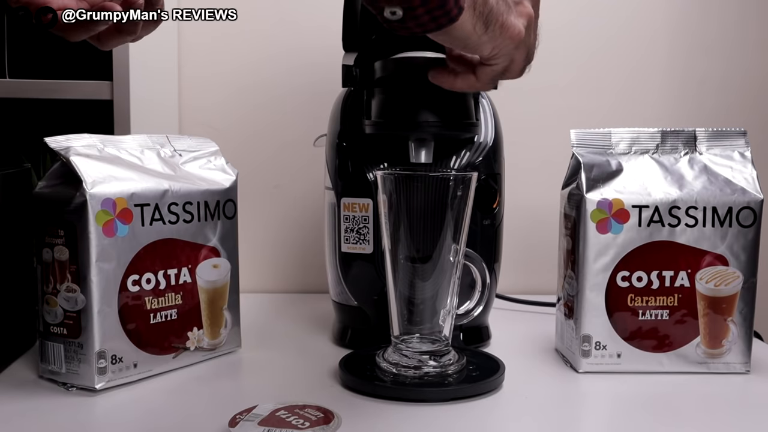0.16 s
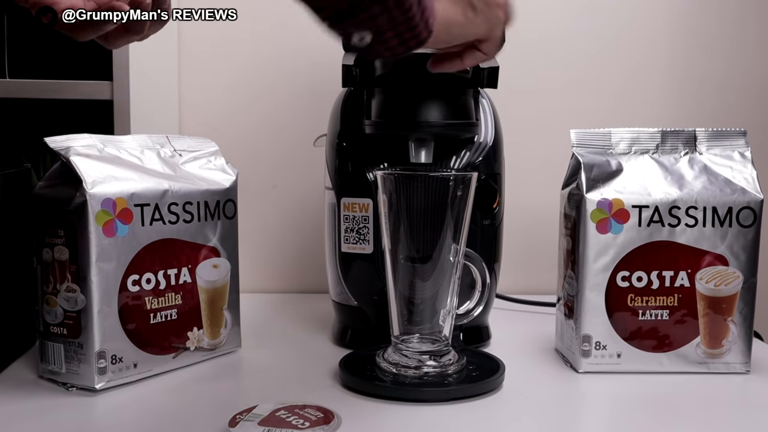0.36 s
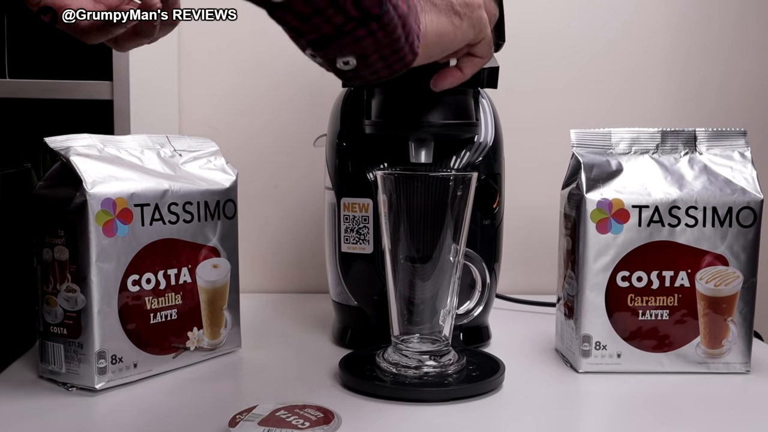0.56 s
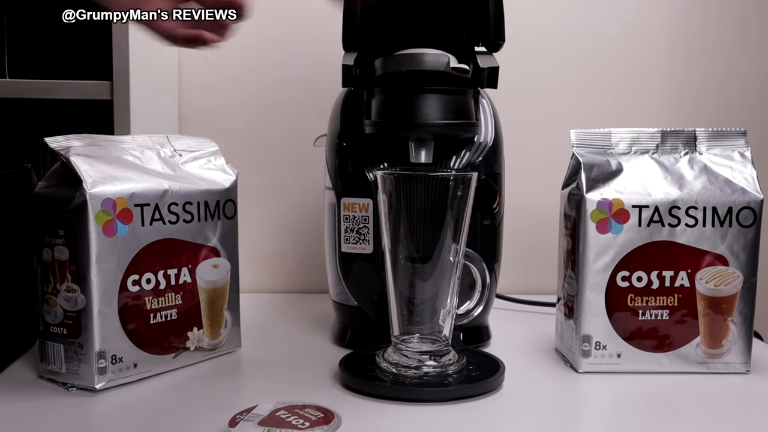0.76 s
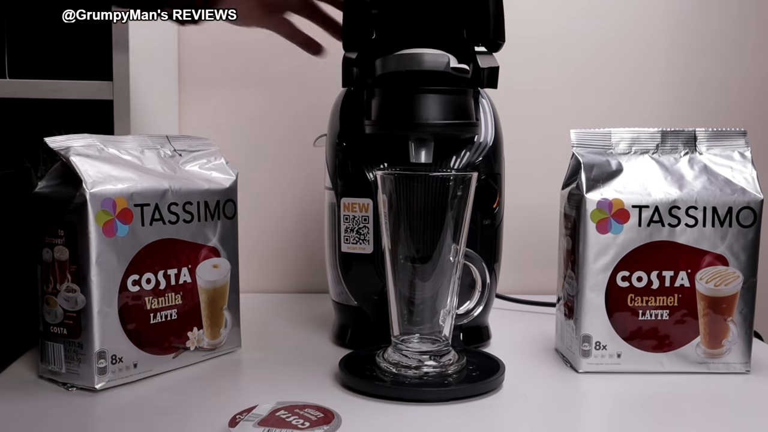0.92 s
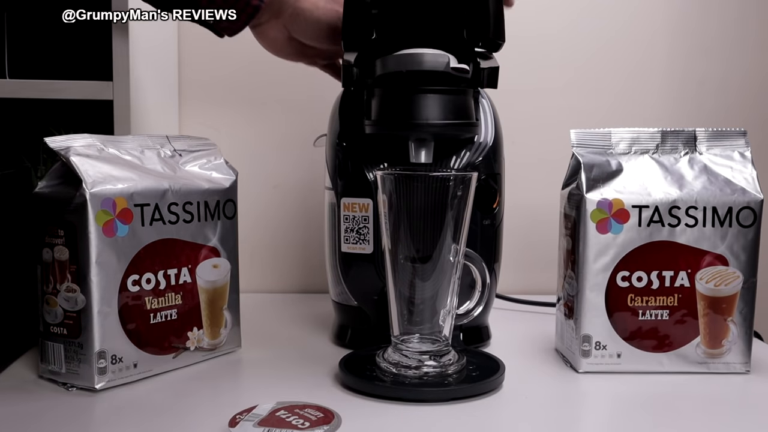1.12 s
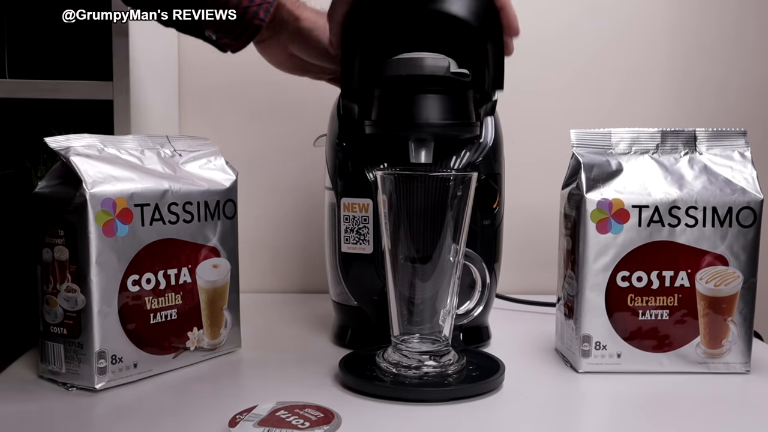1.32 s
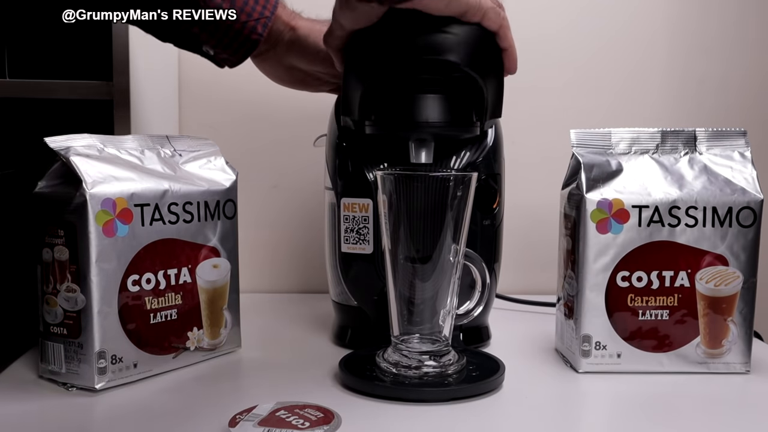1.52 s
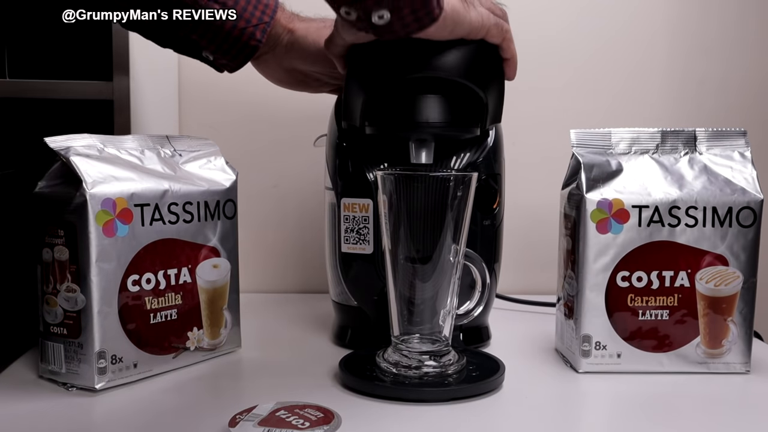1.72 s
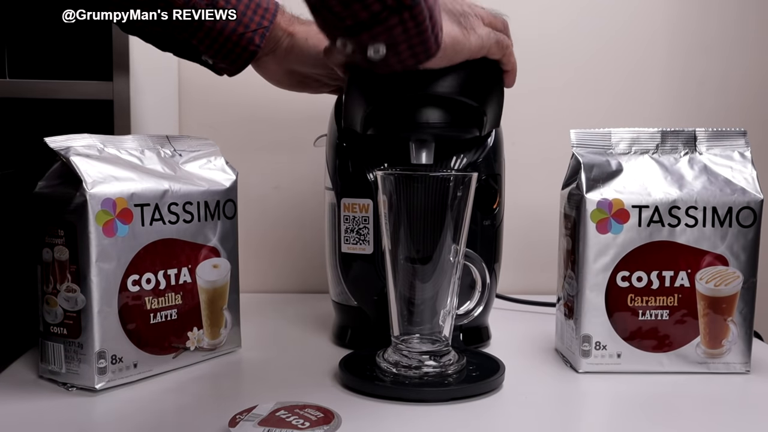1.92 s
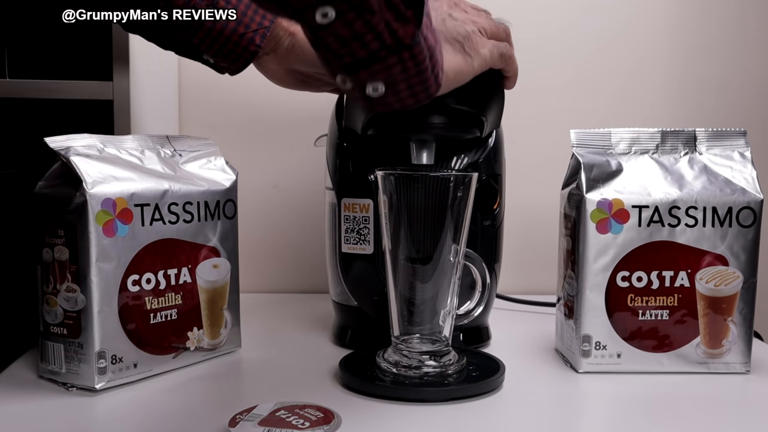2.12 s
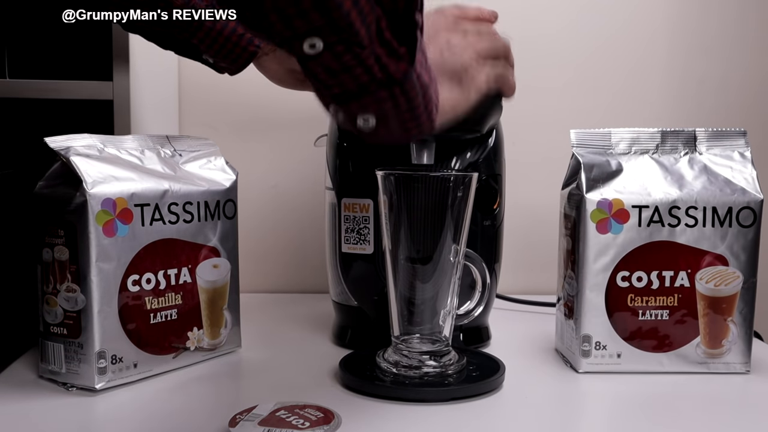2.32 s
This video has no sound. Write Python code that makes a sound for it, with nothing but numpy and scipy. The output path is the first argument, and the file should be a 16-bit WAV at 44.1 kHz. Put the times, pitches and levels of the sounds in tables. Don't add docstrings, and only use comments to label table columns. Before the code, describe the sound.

Hollow plastic clicks and knocks as a coffee machine is loaded with a pod and shut

```python
import sys
import numpy as np
from scipy import signal
from scipy.fft import rfft, irfft, next_fast_len
from scipy.io import wavfile
from scipy.ndimage import map_coordinates

SR = 44100
rng = np.random.default_rng(int(sys.argv[2]) if len(sys.argv) > 2 else 0)


def file_out(sig):
    cols = np.atleast_2d(sig).T
    lim = np.clip(cols, -1, 1)
    pcm = np.round(lim * 32767).astype(np.int16)
    wavfile.write(sys.argv[1], SR, pcm)


def volts(x):
    e = np.asarray(x, float) / 20
    return 10 ** e


N = 104693

# frequency in Hz, density in dB per Hz.
AIR_SPECTRUM = [(15, -11), (25, -4.5), (140, 4.5), (204, -3.5), (323, 2), (510, -9), (829, -16.5),
                (1080, -16.5), (15600, -29)]
# frequency in Hz, t60 in s.
KITCHEN_T60 = [(150, 0.26), (1000, 0.49), (4000, 0.37), (12000, 0.29)]
# frequency in Hz, level in dB.
KITCHEN_TONE = [(150, 4.5), (350, 1.5), (700, -1.2), (4000, -3.55)]

# time in s, brushing level in dB.
SLEEVE_LEVEL = [
    (.82, -87),
    (0.898, -65),
    (.97, -61),
    (1.05, -57.5),
    (1.13, -59.5),
    (1.19, -67.5),
    (1.28, -67),
]
# frequency in Hz, density in dB per Hz.
CLOTH_SPECTRUM = [(300, -1.5), (900, -3.5), (2000, -10), (5000, -15), (7000, -18), (9000, -28.5),
                  (12000, -22.5), (15500, -34)]
# frequency in Hz, level in dB.
DRAG_SPECTRUM = [(25, -37), (55, 3.5), (120, -5), (350, -4.5), (600, -14), (1200, -43)]
# time in s, level in dB, width in s.
FOLD_FLIPS = [
    (0.9767, -39.5, 0.00056),
    (1.114, -42, 0.0004),
]

# time in s, level in dB.
WORKTOP_THUDS = [
    (1.718, -44.5),
    (1.864, -48),
    (2.003, -52),
    (2.199, -74),
    (2.302, -53),
    (1.549, -84),
]
# frequency in Hz, level in dB, t60 in s.
WORKTOP_MODES = [(49, -17, 0.46), (119.3, -1.5, 0.11)]
# start in s, length in s, dull level in dB, squeak level in dB, squeak in Hz.
RUB_STROKES = [(0, 0.024, -44.5, -63, 3500), (0.187, 0.044, -53.5, -62.5, 3130),
               (0.211, 0.02, -40.5, -47, 4540), (0.33, 0.17, -79, -70.5, 2260),
               (0.402, 0.029, -57.5, -65, 4300), (1.236, 0.0073, -56.5, -60, 4160),
               (1.253, 0.051, -47, -79, 5040), (1.258, 0.19, -52, -64.5, 2100),
               (1.345, 0.31, -61, -65.5, 1860), (1.698, 0.14, -81, -66, 4040),
               (1.858, 0.15, -80, -96, 3460), (2, 0.098, -52, -69.5, 3440), (2.067, 0.021, -67, -62, 2600),
               (2.185, 0.094, -58.5, -69, 2040), (2.278, 0.061, -49.5, -57, 3800),
               (2.31, 0.09, -53.5, -59, 2000)]
# time in s, peak in dB, frequency in Hz, t60 in s.
TAB_PINGS = [(.026, -48, 3900, 0.026), (.029, -48, 3096, 0.075), (.086, -56, 3900, 0.018),
             (.216, -48, 4560, 0.034), (.223, -48, 4780, 0.034), (.227, -39.5, 3460, 0.014),
             (.241, -44, 4750, 0.01), (.241, -59, 3840, 0.017), (.253, -45, 5400, 0.014),
             (.254, -39, 3080, 0.035), (.258, -38.5, 5400, 0.0097), (.262, -34.5, 682, 0.15),
             (.507, -59, 3820, 0.021), (.507, -60, 3080, .03), (1.272, -42, 1970, 0.023),
             (1.555, -28, 1170, 0.029), (1.556, -48.5, 3120, 0.032), (1.709, -44, 4660, 0.013),
             (1.709, -39, 3060, 0.024), (1.837, -45, 1780, 0.039), (1.838, -57, 3460, 0.041),
             (1.865, -28.5, 1384, 0.021), (1.866, -50.5, 3420, 0.03), (1.999, -36, 533, 0.06),
             (2.001, -52.5, 2900, 0.017), (2.011, -55.5, 3810, .04), (2.017, -59.5, 6600, 0.012),
             (2.074, -54, 1834, 0.041), (2.076, -58, 2740, 0.035), (2.295, -56, 4200, 0.069),
             (2.304, -56, 4150, 0.041), (.0248, -29.5, 715, 0.021), (0.0246, -32, 1360, 0.03),
             (.327, -44, 1730, .03), (.683, -52.5, 1740, 0.038), (0.5057, -43, 880, 0.032),
             (1.709, -29, 1463, 0.018)]

# time in s, shell peak in dB, chamber over it in dB, crack over it in dB,
# favoured pitch in Hz.
POD_KNOCKS = [(.025, -27, -12, -14, 770), (0.030, -23.5, -4.5, -25, 970), (.037, -34, 5.5, -12, 900),
              (.059, -28.5, -9.5, -26, 1130), (0.087, -37, 0, -28, 900), (0.222, -24, -18, -13.5, 1020),
              (.2275, -22.5, -2.5, -24, 900), (0.24, -22, -17, -21, 940), (.253, -20.5, -35, -13.5, 944),
              (0.257, -20, -5.5, -33, 900), (.326, -34.5, -20, -26, 1650), (0.342, -50, 8.5, -35, 690),
              (.394, -60, 4, -30, 880), (0.506, -33.5, -36, -21, 780), (0.513, -40.5, -1.5, -38, 795),
              (.519, -41, -29, -38, 1140), (0.542, -49, -5, -30, 690), (.673, -42, -6, -37, 874),
              (0.682, -36.5, -10.5, -44, 1150), (.701, -50, -5, -42, 780)]
# time in s, shell peak in dB, chamber over it in dB, crack over it in dB,
# favoured pitch in Hz.
LID_KNOCKS = [(1.269, -37.5, -2, -19, 900), (1.275, -47, 10, -23, 900), (1.297, -36.5, -5, -21, 830),
              (1.302, -36, -9, -17, 900), (1.331, -45, -9, -33, 870), (1.341, -45.5, 7.5, -23, 810),
              (1.554, -24.5, -17.5, -26, 1050), (1.558, -32.5, -17, -28, 1070),
              (1.562, -34.5, -1, -29, 880), (1.568, -36, -6.5, -20, 840), (1.601, -46, -37, -19, 1190),
              (1.62, -44.5, -21, -30, 1060)]
# time in s, shell peak in dB, chamber over it in dB, crack over it in dB,
# favoured pitch in Hz.
CATCH_KNOCKS = [(1.684, -36.5, -6, -29, 880), (1.708, -16.5, -17.5, -16, 880),
                (1.7204, -29, -0.5, -13, 880), (1.731, -50, -26, -26, 855), (1.738, -27.5, -7.5, -22, 880),
                (1.752, -36, -10, -22, 880), (1.764, -52, -16, -13, 860), (1.783, -55, -1, -6, 880),
                (1.837, -26.5, -5.5, -30.5, 900), (1.864, -20.5, -13, -23, 910),
                (1.873, -36, 8.5, -40, 890), (1.889, -51, 5, -38, 880), (1.916, -50, 6, -50, 850),
                (1.998, -26.5, -11, -36, 893), (2.003, -35.5, -7.5, -19, 545), (2.017, -38, -14, -22, 940),
                (2.034, -42, 4, -32, 856), (2.136, -50, 2.5, -37, 880), (2.219, -52.5, 9.5, -33, 1080),
                (2.304, -37.5, -6.5, -16, 1340), (2.317, -47, 10, -32, 900)]
# frequency in Hz, level in dB, t60 in s.
SHELL_MODES = [(548, -0.5, 0.029), (753, -10.5, 0.0099), (806, -16.5, 0.038), (880, -7, 0.041),
               (982.5, 2, 0.021), (1139, -0.5, 0.016), (1292, -4.5, 0.015), (1640, 3.5, 0.0082),
               (1860, -5.5, 0.017), (2560, -23, 0.016)]
# frequency in Hz, level in dB, t60 in s.
LID_MODES = [(533, -1.5, 0.031), (690, -2, 0.029), (845, -3, .04), (884, -1, .04), (940, -8, .025),
             (1034, -4, 0.031), (1250, -8, 0.029), (1416, 1.5, 0.014), (1670, -0.5, 0.023), (1806, 0, .018),
             (2000, -0.5, 0.02), (2650, -20, 0.012)]
# frequency in Hz, level in dB, t60 in s.
OPEN_CHAMBER = [(157.6, -20.5, 0.11), (312, 5.5, 0.072), (336.8, -4.5, 0.095), (406, -5, 0.039)]
# frequency in Hz, level in dB, t60 in s.
COVERED_CHAMBER = [(160, -13, 0.081), (303.8, -1.5, 0.076), (332, -1.5, 0.042), (376, -7, 0.056)]
# frequency in Hz, level in dB.
CRACK_SPECTRUM = [(800, -39), (2400, -6), (3300, -3), (3900, -5), (4600, -4.5), (5400, -6), (6500, -8.5),
                  (15000, -37.5)]
# frequency in Hz, level in dB.
SNAP_SPECTRUM = [(4000, -45), (8000, 14.5), (13000, 16), (16000, 16)]
# frequency in Hz, level in dB.
RATTLE_SPECTRUM = [(200, -12.5), (400, 2.5), (900, 2.5), (1600, -9), (3000, -17), (8000, -39)]

SHELL_ATTACK_S, CHAMBER_SWELL_S, THUD_SWELL_S, CHATTER_S = 0.00046, 0.0049, 0.01, 0.002183
SHELL_DB, CHAMBER_DB, CRACK_DB, RATTLE_DB = -7, -2, -4.5, -16.5
CRACK_T60_S, RATTLE_T60_S = 0.027, 0.14
SNAP_DB, SNAP_DB_PER_DB, HARD_CRACK_DB = -10.5, 0.54, -38
AIR_DB, DRAG_DB, TICK_DB, KITCHEN_DB = -63.5, -54, -45.5, -15


def unit(x):
    return x / np.sqrt(np.mean(x ** 2) + 1e-20)


def along(points, hz):
    point_hz, value = np.transpose(points)
    return np.interp(np.log(hz + 1), np.log(point_hz + 1), value)


def noise(spectrum, size):
    m = next_fast_len(size)
    white = rfft(rng.standard_normal(m))
    gain = volts(along(spectrum, np.fft.rfftfreq(m, 1 / SR)))
    return unit(irfft(white * gain, m)[:size])


def wobble(rate_hz):
    return map_coordinates(rng.standard_normal(N // 40), [np.arange(N) * rate_hz / SR])


def ring(modes, t, attack_s, spot_hz=0):
    hz, db, t60 = np.transpose(modes)[..., None]
    strength, detune = rng.standard_normal((2, len(modes), 1))
    db = db + 2 * strength
    if spot_hz:
        octaves = np.log2(hz / spot_hz)
        db = db - 14 * np.abs(octaves) - 11 * np.maximum(octaves, 0)
    tones = volts(db - 60 * t / t60) * np.sin(2 * np.pi * hz * (1 + 0.006 * detune) * t)
    sound = tones.sum(0) * (1 - np.exp(-t / attack_s)) ** 2
    return sound / np.abs(sound).max()


def add(out, start_s, sound):
    out[round(start_s * SR):][:len(sound)] += sound


def air():
    return volts(AIR_DB + 0.81 * wobble(11.5)) * noise(AIR_SPECTRUM, N)


def kitchen(x):
    out = np.zeros(N + SR)
    for start in range(0, N, SR // 4):
        hz, t, grid = signal.stft(rng.standard_normal(SR // 2), SR, nperseg=256)
        decay_db = 60 * t / along(KITCHEN_T60, hz)[:, None]
        gain = volts(along(KITCHEN_TONE, hz)[:, None] - decay_db)
        tail = signal.istft(grid * gain, SR, nperseg=256)[1]
        answer = signal.fftconvolve(x[start:start + SR // 4], tail / np.linalg.norm(tail))
        add(out, start / SR + 0.0067, answer)
    return out[:N]


def sleeve():
    t = np.arange(N) / SR
    level_s, level_db = np.transpose(SLEEVE_LEVEL)
    brush_db = np.interp(t, level_s, level_db, -120, -120) + wobble(31.23)
    out = volts(brush_db) * noise(CLOTH_SPECTRUM, N)
    pull = np.interp(t, [.965, .985, 1.12, 1.17], [0.011, 0.86, 0.57, 0.21])
    out += volts(DRAG_DB + 2.4 * wobble(25.75)) * pull * noise(DRAG_SPECTRUM, N)
    for flip_s, db, width_s in FOLD_FLIPS:
        u = (t - flip_s) / width_s
        out -= volts(db) * (1 - u - u ** 2) * np.exp(-u ** 2)
    static = noise([(1000, -2), (3000, -1), (7000, -7), (16000, -12)], 400)
    add(out, 1.1935, volts(TICK_DB - 60 * t[:400] / 0.005) * static)
    return out


def thuds():
    out, t = np.zeros(N + SR), np.arange(SR // 2) / SR
    for start_s, db in WORKTOP_THUDS:
        add(out, start_s, volts(db) * ring(WORKTOP_MODES, t, THUD_SWELL_S))
    return out[:N]


def rubs():
    t = np.arange(SR // 8) / SR
    body = ring(SHELL_MODES, t, SHELL_ATTACK_S, 900) + 0.4 * ring(OPEN_CHAMBER, t, SHELL_ATTACK_S)
    grains = volts(wobble(90))
    driven = signal.fftconvolve(grains * rng.standard_normal(N), body)[:N]
    dull = unit(driven) + grains * noise(RATTLE_SPECTRUM, N)
    out = np.zeros(N + SR)
    for start_s, length_s, dull_db, squeak_db, hz in RUB_STROKES:
        band = [(hz / 4, -28), (hz / 1.3, -8), (hz, 0), (hz * 1.17, -14), (hz * 3, -36)]
        span = slice(round(start_s * SR), min(N, round((start_s + length_s) * SR)))
        squeak = grains[span] * noise(band, N)[span]
        stroke = np.interp(np.linspace(0, 1, len(squeak)), [0, 0.43, 1], [0, 1, 0])
        friction = volts(dull_db) * unit(dull[span]) + volts(squeak_db) * unit(squeak)
        add(out, start_s, stroke * friction)
    return out[:N]


def pings():
    out, t = np.zeros(N + SR), np.arange(SR // 4) / SR
    for start_s, db, hz, t60 in TAB_PINGS:
        twins = [(hz, 0, t60), (hz * 1.04, -6, t60)]
        add(out, start_s, volts(db) * ring(twins, t, SHELL_ATTACK_S))
    return out[:N]


def knock(row, modes, cavity, t):
    _, db, chamber_db, crack_db, hz = row
    attack_s = SHELL_ATTACK_S * 10 ** ((-15 - db) / 60)
    edge = volts(-2) * ring(modes, t, attack_s, hz * 1.55)
    body = np.pad(ring(modes, t, attack_s, hz), (round(CHATTER_S * SR), 0))[:len(t)]
    hollow = volts(CHAMBER_DB + chamber_db) * ring(cavity, t, CHAMBER_SWELL_S)
    snap_db = SNAP_DB + SNAP_DB_PER_DB * (db + crack_db - HARD_CRACK_DB)
    burst = noise(CRACK_SPECTRUM, len(t)) + volts(snap_db) * noise(SNAP_SPECTRUM, len(t))
    crack = volts(CRACK_DB + crack_db - 60 * t / CRACK_T60_S) * burst
    rattle = volts(RATTLE_DB - 60 * t / RATTLE_T60_S) * noise(RATTLE_SPECTRUM, len(t))
    rattle *= 1 - np.exp(-t / CHATTER_S)
    return volts(db) * (volts(SHELL_DB) * (edge + body) + hollow + crack + rattle)


def knocks():
    out, t = np.zeros(N + SR), np.arange(SR // 4) / SR
    for row in POD_KNOCKS:
        add(out, row[0], knock(row, SHELL_MODES, OPEN_CHAMBER, t))
    for row in LID_KNOCKS + CATCH_KNOCKS:
        add(out, row[0], knock(row, LID_MODES, COVERED_CHAMBER, t))
    return out[:N]


def scene():
    machine = thuds() + rubs() + pings() + knocks()
    return (air() + volts(KITCHEN_DB) * kitchen(machine) + sleeve() + machine)[None]


def roll_off(x):
    return signal.sosfilt(signal.butter(12, 16430, fs=SR, output="sos"), x)


def record(dry):
    hz = np.fft.rfftfreq(N, 1 / SR)
    loss_db = np.clip((hz - 15750) / 10, 0, 25)
    mix = irfft(rfft(dry) * volts(-loss_db), N)
    return roll_off(mix)


dry = scene()
out = record(dry)
file_out(out)
```